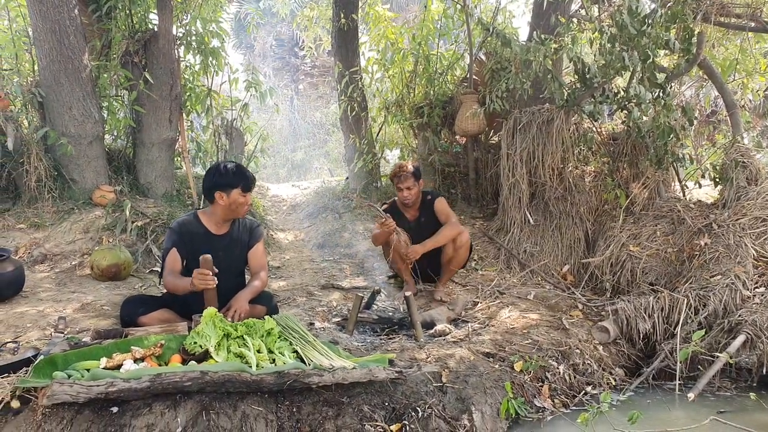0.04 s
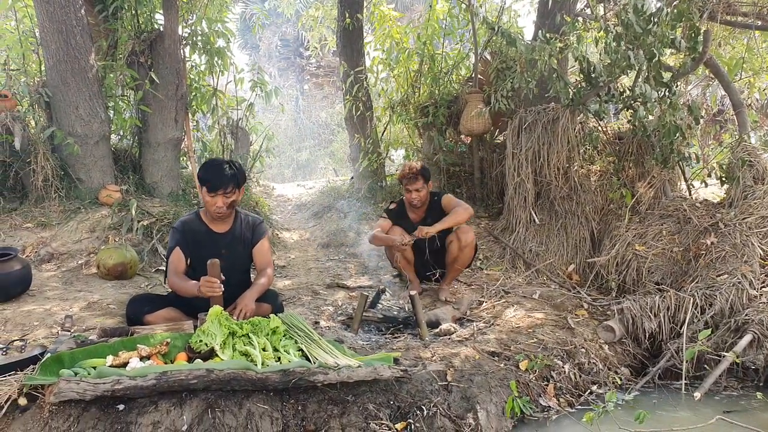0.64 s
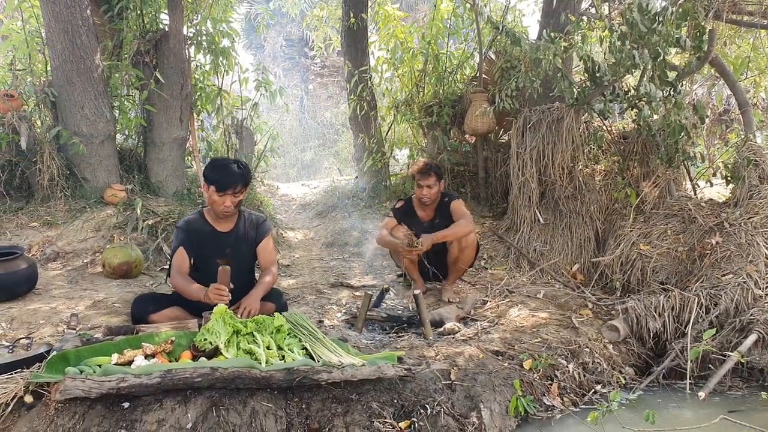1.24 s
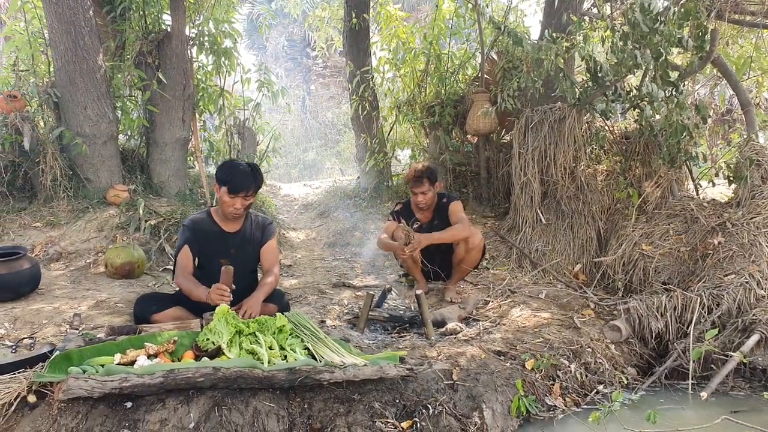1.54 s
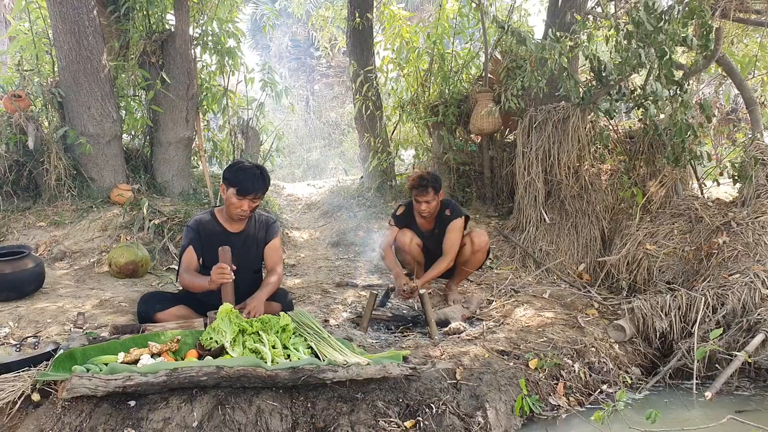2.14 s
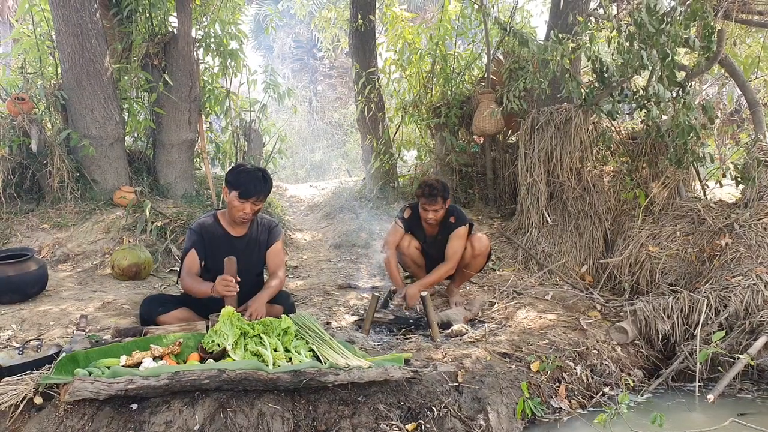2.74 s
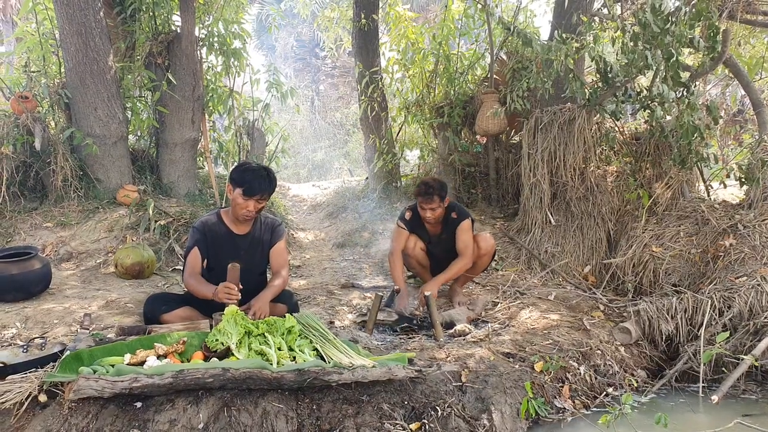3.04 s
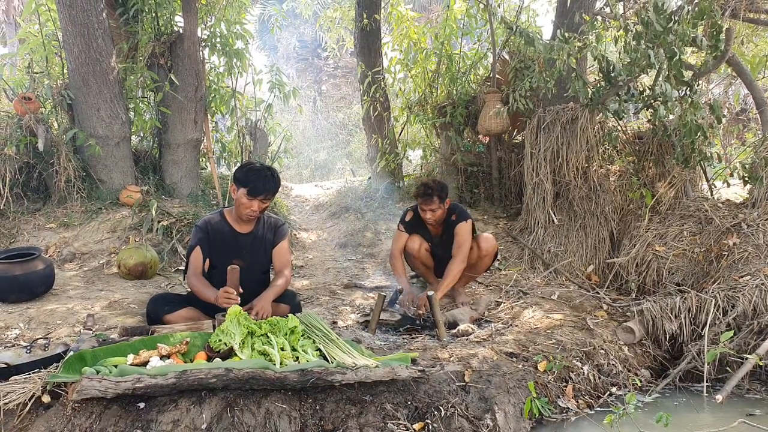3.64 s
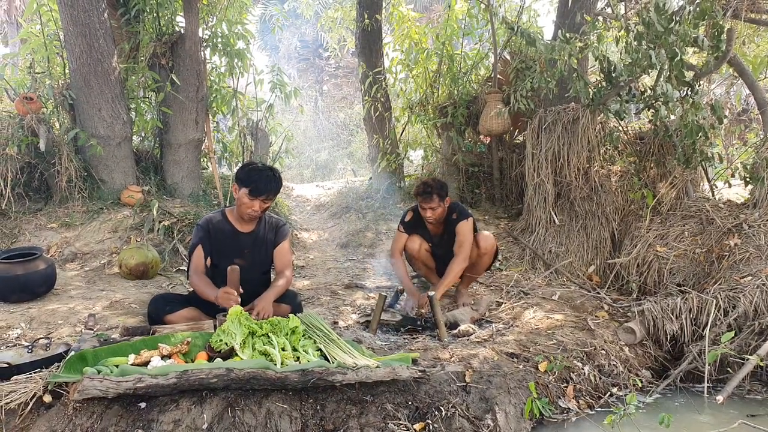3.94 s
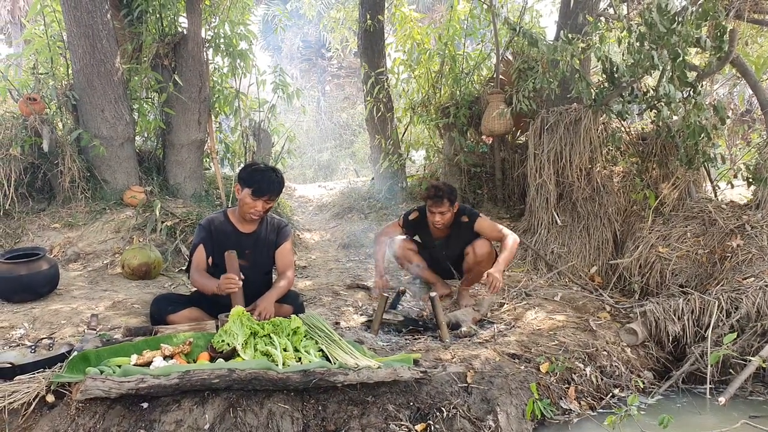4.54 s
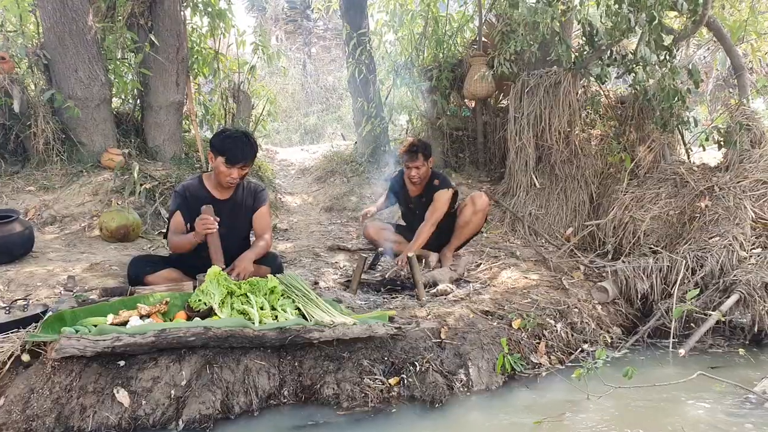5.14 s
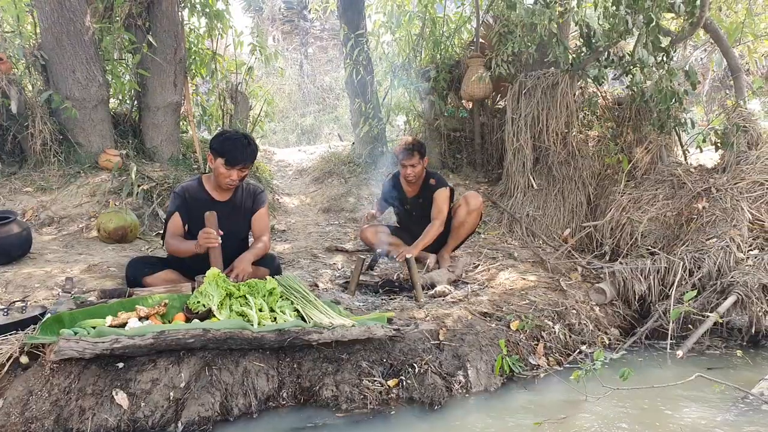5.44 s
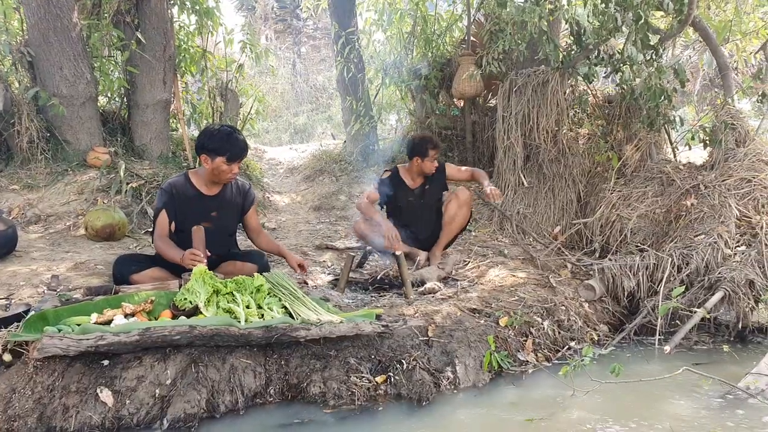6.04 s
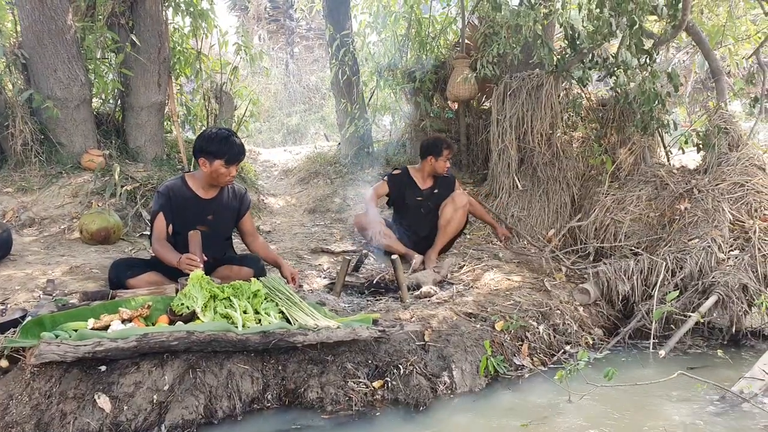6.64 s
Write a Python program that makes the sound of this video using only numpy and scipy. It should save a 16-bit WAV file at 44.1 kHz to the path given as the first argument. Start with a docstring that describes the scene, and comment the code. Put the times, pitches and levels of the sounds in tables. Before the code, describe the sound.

A wooden pestle pounds herbs in a mortar close to the stereo microphones, slightly to the right, about three strokes a second. Full blows give a bright, hollow wooden knock; weak ones land dully, with a faint crunch and a wet gulp of air. Strokes begin at 0.2 seconds, turn softer from about 1.6 to 3.4 apart from one hard blow at 2.6, then come as four firm knocks between 3.7 and 4.7. A soft stroke follows at 5.3 and a last hard one at 5.7.

Twigs snap lightly in a small fire, mostly during the first second, then occasionally. Leaves swish faintly at 1.2 seconds. Dull ground bumps come at 2.4, 4.7 and 4.9. A stream murmurs quietly throughout, with scattered wet plinks. At 5.8 a distant bird gives one very faint falling whistle, leaving the water until the end, near 7 seconds.

```python
"""A camp on a wooded stream bank, heard through a stereo pair of microphones.
Close by, a wooden pestle pounds herbs about three strokes a second: full blows knock through to the
mortar's wood, weak ones land dully in the crunching mash, and air gulps in and out of the bowl.
Twigs snap and settle at a small fire. The stream murmurs; wet plinks come from it and from the mash.
The ground bumps three times, leaves swish once, and near the end a far bird whistles among the trees."""
import sys
import numpy as np
from scipy import signal
from scipy.fft import rfft, irfft, next_fast_len
from scipy.io import wavfile

SR = 44100
rng = np.random.default_rng(int(sys.argv[2]) if len(sys.argv) > 2 else 0)


def master_out(mix):
    """Clip the mix to full scale and print it as 16-bit PCM to the path in sys.argv[1]."""
    frames = np.transpose(np.atleast_2d(mix))
    ceiling = np.clip(frames, -1, 1)
    pcm = np.round(ceiling * 32767).astype(np.int16)
    wavfile.write(sys.argv[1], SR, pcm)


N = 299728
TIME = np.arange(N) / SR

# Pestle contacts, close to the microphones; some strokes touch the heap lightly, then land again.
# start_s, force_db, crunch_db, gulp_after_s, gulp_hz, gulp_db, suck_db
CONTACTS = [(0.2104, -1.5, -41, 0.015, 460, -15.5, -30.5), (0.5386, 0.66, -40.5, 0.027, 516, -24.5, -42),
            (0.8751, -11, -43, .008, 364, -27, -51), (1.2279, -0.5, -40.5, 0.025, 440, -23.5, -39),
            (1.5917, -10, -45, 0.023, 489, -20.5, -25.5), (1.938, -25, -46.5, 0.017, 462, -30, -35),
            (1.9510, -16.5, -57, 0.02, 474, -24, -32), (2.2334, -13, -62, .008, 467, -32, -51),
            (2.283, -15, -44, .012, 503, -22.5, -31.5), (2.6322, -0.5, -38.5, 0.028, 455, -22, -23.5),
            (2.9774, -11.5, -41, 0.016, 432, -19.5, -31), (3.336, -20, -45, 0.0096, 460, -28.5, -41),
            (3.3529, -11.5, -71, 0.0012, 458, -20, -48), (3.684, -0.5, -42.5, 0.021, 486, -17, -34),
            (4.0160, 0, -42, .021, 471, -19, -40), (4.3546, -0.5, -44.5, .020, 454, -25.5, -54),
            (4.6892, -1, -43.5, 0.026, 457, -28, -52), (5.3087, -20, -42, 0.016, 490, -27.5, -58),
            (5.3490, -16, -64, 0.015, 473, -24, -43), (5.6992, 0.5, -41, 0.025, 497, -21, -28)]
# Modes of the mortar and pestle: pitch_hz, level_db, t60_s, first_swing_sign
WOOD_MODES = [(248.6, -21.5, 0.034, -1), (318, -31.5, 0.11, -1), (377.4, -27.5, 0.13, -1),
              (465.8, -22.5, 0.12, 1), (555.7, -13.5, 0.09, 1), (639, -29, 0.13, 1), (854.5, -7, 0.027, 1),
              (1040, -38, 0.064, 1), (1137, -14.5, 0.035, -1), (1229, -6, .014, -1),
              (1468, -24.5, 0.073, -1), (2105, -15, 0.03, 1), (2100, -57, 0.018, 1),
              (2700, -8.5, 0.0045, -1), (4000, -68, 0.015, 1)]
# Echoes off the ground and the nearest trunks: delay_s, pressure_ratio
NEAR_ECHOES = [(.00408, 0.72), (.00869, -.17), (0.0124, .33), (0.021, 0.27)]
def pestle(vary_db, detune, echo_hz, crack_db, crack_t60, crack_hz):
    """Each contact rings the mortar's modes; mash under the pestle lengthens the push and dulls it."""
    out, t = np.zeros(N), TIME[:SR // 2]
    full_blow_hz, force_db_per_octave = 1760, 8.5   # a full blow reaches bare wood and is bright
    thinning_octaves_per_s = 0.051   # the cushion of herbs wears thin
    hz, db, t60, swing = np.transpose(WOOD_MODES)
    decays = np.array([dying(each) for each in t60])
    for s, force_db, *_ in CONTACTS:
        contact_hz = full_blow_hz * 2 ** (force_db / force_db_per_octave + thinning_octaves_per_s * s)
        strength, shift = rng.standard_normal((2, len(hz)))   # no two land on the same spot
        modes = decays * np.sin(2 * np.pi * (hz * (1 + detune * shift))[:, None] * t)
        knock = (np.sign(swing) * from_db(db + vary_db * strength)) @ modes
        # the wood's many weak modes blur into a short crack
        blur = rms_one(band_noise(crack_hz / 2, crack_hz * 2, len(t)))
        crack = from_db(crack_db) * dying(crack_t60) * blur
        add(out, s, from_db(force_db) * soften(soften(knock + crack, contact_hz), contact_hz))
    echoes = sum(ratio * delayed(out, s) for s, ratio in NEAR_ECHOES)
    return out + soften(echoes, echo_hz)


def bowl(squelch_db, squelch_hz, thud_db, thud_hz):
    """Air leaves the bowl as the pestle sinks and returns as it lifts: a hollow note, thud and squelch."""
    notes, squeeze, t = np.zeros(N), np.zeros(N), TIME[:SR // 10]
    gulp_swell_s, suck_swell_s, suck_after_s, suck_hz = 0.006, 0.0072, 0.029, 483
    base_thud = from_db(thud_db) * np.sin(2 * np.pi * thud_hz * t)
    for s, _, _, gulp_after_s, gulp_hz, gulp_db, suck_db in CONTACTS:
        gulp = (gulp_after_s, gulp_swell_s, gulp_hz, gulp_db)
        suck = (gulp_after_s + suck_after_s, suck_swell_s, suck_hz, suck_db)
        for after_s, swell_s, hz, db in gulp, suck:
            push = from_db(db) * (t / swell_s * np.exp(1 - t / swell_s)) ** 2
            add(notes, s + after_s, push * (np.sin(2 * np.pi * hz * t) + base_thud))
            add(squeeze, s + after_s, push)
    wet_mash = rms_one(band_noise(squelch_hz / 6, squelch_hz, N, order=4))
    return notes + from_db(squelch_db) * soften(squeeze, hz=27) * wet_mash


# The crunch as picked up, with the microphones' dip near 8 kHz: frequency_hz, relative_db
HERB_SPECTRUM = [(1200, 15.5), (1850, 2), (2130, 15), (2500, -2.5), (4500, 3.5), (6200, -7), (8200, -16.5),
                 (10500, -2), (12500, 1.5), (16000, -7)]
def herbs(lead_s, rise_t60, stalk_t60, crunch_t60):
    """Just ahead of each contact one stalk breaks, then the leaves burst in a quick crunch."""
    crush = np.zeros(N)
    shape = dying(stalk_t60) + dying(crunch_t60) * (1 - dying(rise_t60))
    for s, _, crunch_db, *_ in CONTACTS:
        add(crush, s - lead_s, from_db(crunch_db) * shape)
    return coloured(crush * grains(per_s=14000, spread_db=1.5), HERB_SPECTRUM)


# Twigs and dry leaves snapping at the fire: start_s, level_db, left_over_right_db, ring_relative_db
TWIG_SNAPS = [(-0.02, -35, -3, -25), (0.109, -35, -2.5, -5), (0.401, -31, -0.5, -15),
              (0.447, -35.5, 2, -26), (0.513, -35, 5, -19), (0.592, -34.5, 2, -13), (0.663, -39, -2, -24),
              (0.7561, -28, -2.5, -4.5), (0.902, -40.5, 4, -20), (1.124, -43.5, 0, -15),
              (2.434, -39, -5, -8), (2.533, -42.5, 2, -20), (4.237, -45.5, -7.5, -2.5),
              (4.8644, -46.5, 9, -20), (5.518, -48, 1, -5)]
# Flares in the fire's fizz: peak_s, half_width_s, level_db
FIRE_FLARES = [(2.5, 0.32, -65), (6.67, 0.054, -78.5)]
# The fire as picked up, with the microphones' dip near 8 kHz: frequency_hz, relative_db
FIRE_SPECTRUM = [(1200, -6), (2900, -2.5), (4500, -2.5), (6200, -4.5), (8200, -14.5), (10500, 3),
                 (12500, 5.5), (16000, 1)]
def fire(crack_t60, ring_hz, ring_width_hz, ring_t60, settle_t60, fizz_db):
    """Twigs crack with a woody ring and dry sticks rustle as they settle, over a fizz that flares."""
    cracks, rings, settling_power = np.zeros((3, 2, N))
    for s, db, pan_db, ring_db in TWIG_SNAPS:
        add(cracks, s, pan(pan_db) * from_db(db) * dying(crack_t60))
        add(rings, s, pan(pan_db) * from_db(db + ring_db) * dying(ring_t60))
        settle_db = -40 + 1.93 * (db + 30)   # a bigger break shakes more loose
        add(settling_power, s, (pan(pan_db) * from_db(settle_db) * dying(settle_t60)) ** 2)
    flares = sum(from_db(db) * np.exp(-((TIME - s) / width_s) ** 2) for s, width_s, db in FIRE_FLARES)
    fizz = from_db(fizz_db) + flares
    rustle = np.sqrt(settling_power + fizz ** 2) * grains(per_s=5000, spread_db=2.8)
    resonance = signal.iirpeak(ring_hz, ring_hz / ring_width_hz, fs=SR)
    wood = rms_one(signal.lfilter(*resonance, rng.standard_normal((2, N))))
    return coloured(cracks * rng.standard_normal((2, N)) + rustle, FIRE_SPECTRUM) + rings * wood


# Dull bumps on the camp ground: start_s, level_db
GROUND_BUMPS = [(2.424, -27), (4.655, -30), (4.883, -22)]
def bumps(hz, t60):
    """Packed earth gives one heavily damped swing."""
    out = np.zeros(N)
    for s, db in GROUND_BUMPS:
        add(out, s, from_db(db) * dying(t60) * np.sin(2 * np.pi * hz * TIME[:SR // 2]))
    return out


# Stream bubbles, and squelches of the mash just after weak strokes: start_s, start_pitch_hz, level_db
WET_PLINKS = [(0.042, 985, -39), (2.097, 1260, -41), (2.349, 1290, -34), (2.608, 1500, -32),
              (3.039, 1225, -38), (3.073, 1570, -40.5), (3.379, 1250, -33.5), (3.618, 1235, -37.5),
              (4.25, 940, -39), (5.005, 733, -38), (5.372, 1250, -39)]
def plinks(ring_t60, rise_t60, glide, faint_db, faint_count):
    """Short wet plinks of stream and mash ring and rise in pitch; many faint ones come at random."""
    out, t = np.zeros(N), TIME[:SR // 2]
    faint = [(when * N / SR, 700 * 2 ** (2 * height), faint_db - 10 * depth)
             for when, height, depth in rng.random((faint_count, 3))]
    shape = dying(ring_t60) * (1 - dying(rise_t60))
    for s, hz, db in WET_PLINKS + faint:
        add(out, s, from_db(db) * shape * np.sin(2 * np.pi * hz * (t + glide * t ** 2)))
    return out


# The stream as picked up on the bank, with the microphones' dip near 8 kHz: frequency_hz, relative_db
MURMUR_SPECTRUM = [(25, -20), (45, -12), (63, -5), (105, -2), (150, -8.5), (215, -3), (405, -11.5),
                   (530, -10), (680, -16), (1790, -22), (5140, -35.5), (6500, -41.5), (8360, -51),
                   (12000, -38), (16000, -47)]
# Slow drift of the murmur: time_s, level_db
MURMUR_LEVELS = [(0, -47), (3.6, -46.5), (6.8, -47)]
def stream(swell_db):
    """A steady low murmur of water and air that swells a little."""
    murmur = coloured(rng.standard_normal((2, N)), MURMUR_SPECTRUM)
    drift = from_db(np.interp(TIME, *np.transpose(MURMUR_LEVELS)))
    return drift * flutter(swell_db, hz=4.9) * murmur / murmur.mean(axis=0).std()


# The leaves as picked up, with the microphones' dip near 8 kHz: frequency_hz, relative_db
LEAF_SPECTRUM = [(2500, -37), (3800, -6), (4300, -0.5), (6500, -5), (8200, -19), (11000, -10), (16000, -14)]
def leaves(db):
    """One faint, grainy swish of leaves."""
    swish = from_db(db) * held(start_s=1.168, rise_s=0.15, length_s=0.19, fall_s=0.088)
    swish = swish * flutter(depth_db=3.5, hz=40)
    return coloured(swish * grains(per_s=6200, spread_db=2.5), LEAF_SPECTRUM)


def bird(start_s, start_hz, sag_hz_per_s, db):
    """A far bird whistles one thin, falling note that wavers in level."""
    hz = start_hz - sag_hz_per_s * (TIME - start_s)
    shape = held(start_s, rise_s=0.012, length_s=0.089, fall_s=0.012) * flutter(depth_db=5, hz=25)
    return from_db(db) * shape * np.sin(2 * np.pi * np.cumsum(hz) / SR)


# Scatter coming back from the trees: frequency_hz, level_db, t60_s
TREE_SCATTER = [(150, -20.5, 0.24), (490, -9, 0.1), (940, -26.5, 0.4), (2180, -23.5, 0.12),
                (5000, 0.5, 0.34)]
def woods(x, build_t60):
    """Trunks and brush scatter a short diffuse tail that dies band by band."""
    edges_hz, tail = 70 * 2. ** np.arange(8), 0
    for low, high in zip(edges_hz, edges_hz[1:]):
        hz = np.sqrt(low * high)
        shape = dying(at_hz(TREE_SCATTER, hz, column=2)) * (1 - dying(build_t60))
        noise = band_noise(low, high, (2, len(shape)))
        tail = tail + noise * shape / np.linalg.norm(shape) * from_db(at_hz(TREE_SCATTER, hz))
    return signal.fftconvolve(x[None], tail, axes=1)[:, :N]


# Diffuse sound at the two microphones: frequency_hz, correlation, left_over_right_db
OPEN_AIR = [(59.6, 1, -5.5), (130, 0.6, -3), (308, 0.61, -4.5), (710, -0.17, -4.5), (1390, -0.3, -6),
            (2420, 0.17, -4.5), (4400, -0.24, -11), (5400, 0.44, -10.5), (7650, -0.038, 4),
            (14900, 0.096, 0.5)]
def coloured(pair, spectrum):
    """Give two unrelated signals a spectrum and the likeness and balance of the open air."""
    hz = np.fft.rfftfreq(next_fast_len(N + SR // 10), 1 / SR)
    mid, side = rfft(pair, 2 * (len(hz) - 1)) * rms_one(from_db(at_hz(spectrum, hz)))
    alike = np.clip(at_hz(OPEN_AIR, hz), -1, 1)
    lean = from_db(at_hz(OPEN_AIR, hz, column=2) / 2)
    mid, side = mid * np.sqrt(1 + alike), side * np.sqrt(1 - alike)
    return irfft([(mid + side) * lean, (mid - side) / lean])[:, :N]


def grains(per_s, spread_db):
    """Dense tiny fractures of uneven size; rms 1."""
    sizes = from_db(spread_db * np.minimum(rng.exponential(1, N), 4))
    return rms_one(rng.standard_normal((2, N)) * sizes * (rng.random(N) < per_s / SR))


def band_noise(low_hz, high_hz, size, order=2):
    """Noise between two frequencies."""
    band = signal.butter(order, [low_hz, high_hz], "band", fs=SR, output="sos")
    return signal.sosfilt(band, rng.standard_normal(size))


def flutter(depth_db, hz):
    """A gain that wavers at random."""
    return from_db(depth_db * rms_one(soften(soften(rng.standard_normal(N), hz), hz)))


def held(start_s, rise_s, length_s, fall_s):
    """Rise from 0 to 1, hold until length_s after the start, fall back to 0."""
    t = TIME - start_s
    return np.clip(np.minimum(t / rise_s, 1 - (t - length_s) / fall_s), 0, 1)


def dying(t60):
    """Half a second of decay, falling 60 dB in t60 seconds."""
    return from_db(-60 * TIME[:SR // 2] / t60)


def soften(x, hz):
    """One-pole low-pass."""
    r = np.exp(-2 * np.pi * hz / SR)
    return signal.lfilter([1 - r], [1, -r], x + 1e-18)


def lagged(x, corner_hz):
    """An all-pass: the sound arrives a little later, the treble less so."""
    k = np.tan(np.pi * corner_hz / SR)
    return signal.lfilter([k - 1, k + 1], [k + 1, k - 1], x)


def delayed(x, s):
    """The same sound s seconds later."""
    return np.interp(TIME - s, TIME, x, left=0)


def add(out, s, sound):
    """Mix a short sound in at time s; one that began before zero leaves only its tail."""
    start = round(s * SR)
    sound, start = sound[..., max(-start, 0):], max(start, 0)
    out[..., start:start + sound.shape[-1]] += sound[..., :max(N - start, 0)]


def pan(db):
    """Left and right gains with a mean of one; positive db leans left."""
    gains = from_db([[db / 2], [-db / 2]])
    return gains / gains.mean()


def at_hz(rows, hz, column=1):
    """Read one column of a table on a log-frequency axis."""
    rows = np.array(rows)
    return np.interp(np.log(np.maximum(hz, 1)), np.log(rows[:, 0]), rows[:, column])


def from_db(db):
    """Decibels to gain."""
    return 10 ** (np.asarray(db) / 20)


def rms_one(x):
    """Scale to unit rms."""
    return x / np.sqrt(np.mean(x ** 2) + 1e-20)


def scene():
    """Direct sound meets the left microphone first, the right louder and brighter; the rest is spread."""
    knocks = pestle(vary_db=2.0, detune=0.0091, echo_hz=960,
                    crack_db=-24.5, crack_t60=0.084, crack_hz=1780)
    gulps = bowl(squelch_db=-12.5, squelch_hz=1272, thud_db=-8.5, thud_hz=281.6)
    wet = plinks(ring_t60=0.057, rise_t60=0.0016, glide=2.5, faint_db=-49.0, faint_count=40)
    whistle = bird(start_s=5.78, start_hz=2270, sag_hz_per_s=1200, db=-57)
    sources = knocks + gulps + bumps(hz=273, t60=0.011) + wet + whistle
    left = signal.lfilter(*signal.iirnotch(4400, Q=1.8, fs=SR), sources)   # the shaded side
    right = lagged(sources, corner_hz=1600)
    direct = np.array([left, right]) * pan(-6.4)
    scatter = woods(sources, build_t60=0.031) * pan(-6.0)
    swish = leaves(db=-55.5)
    crackle = fire(crack_t60=0.013, ring_hz=3520, ring_width_hz=1000, ring_t60=0.031,
                   settle_t60=0.45, fizz_db=-74.5)
    crunch = herbs(lead_s=0.002, rise_t60=0.0064, stalk_t60=0.034, crunch_t60=0.35)
    return direct + scatter + crunch + crackle + swish + stream(swell_db=1.35)


def record(dry):
    """Bass rolls off below 42 Hz, the level dips once, peaks stop at full scale, the top ends at 16 kHz."""
    low_cut = signal.butter(2, 42, "high", fs=SR, output="sos")
    high_cut = signal.ellip(10, .1, 70, 16000, fs=SR, output="sos")
    dip_db = -19.5 * held(start_s=4.942, rise_s=0.0038, length_s=0.023, fall_s=0.0038)
    sound = signal.sosfilt(low_cut, dry) * from_db(dip_db)
    return signal.sosfilt(high_cut, np.clip(sound, -1, 1))


dry = scene()
out = record(dry)
master_out(out)
```